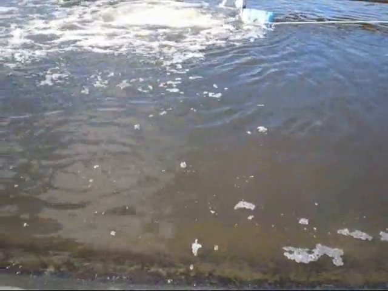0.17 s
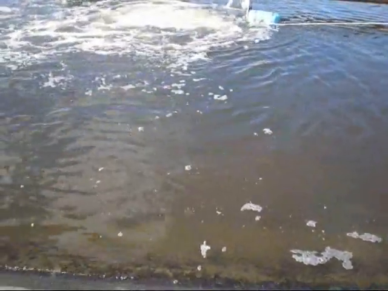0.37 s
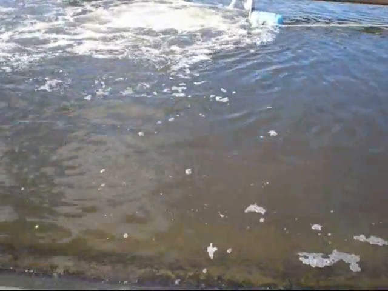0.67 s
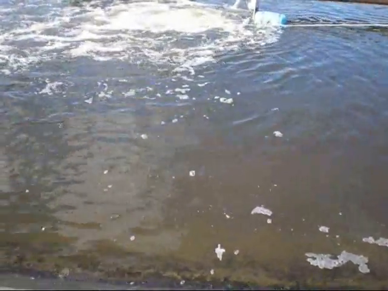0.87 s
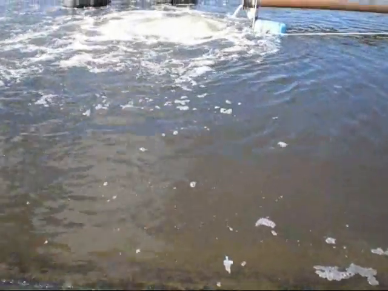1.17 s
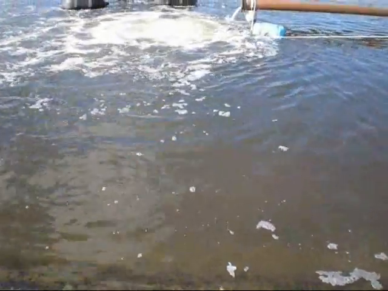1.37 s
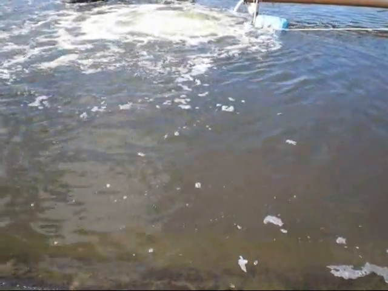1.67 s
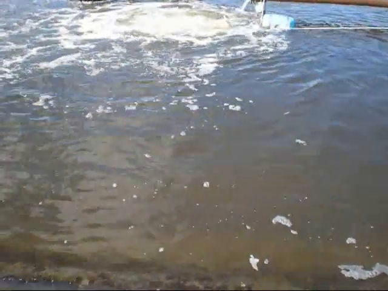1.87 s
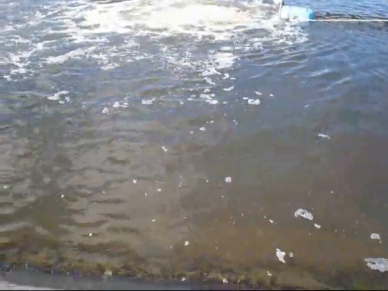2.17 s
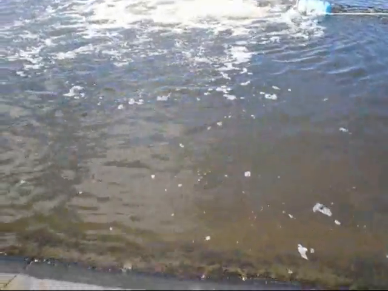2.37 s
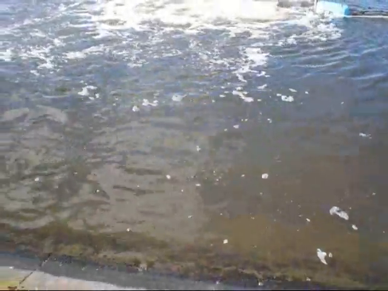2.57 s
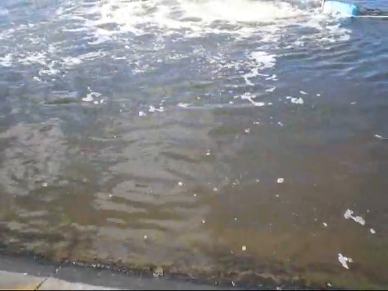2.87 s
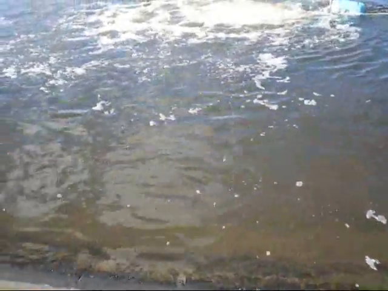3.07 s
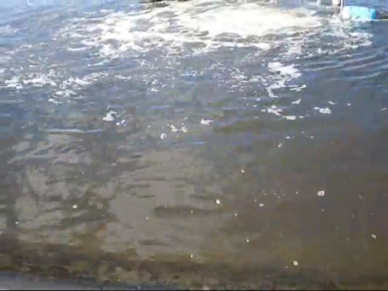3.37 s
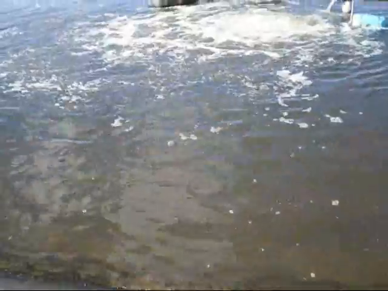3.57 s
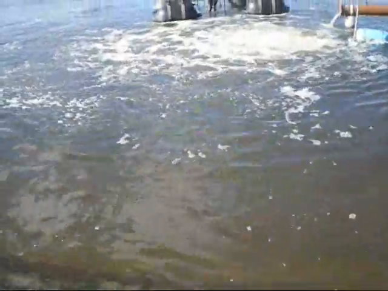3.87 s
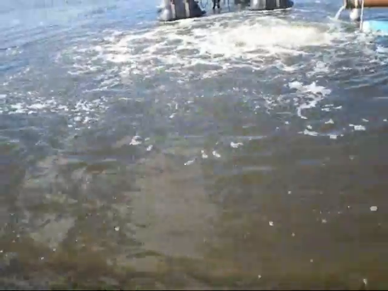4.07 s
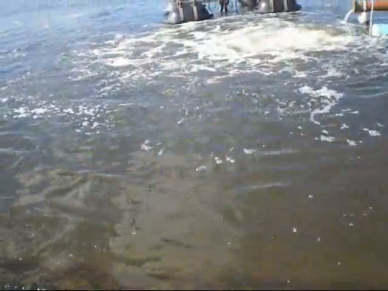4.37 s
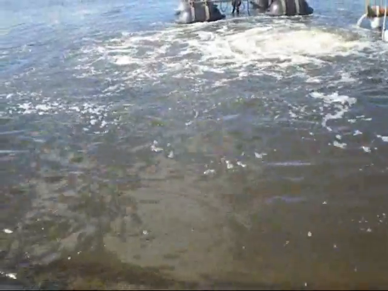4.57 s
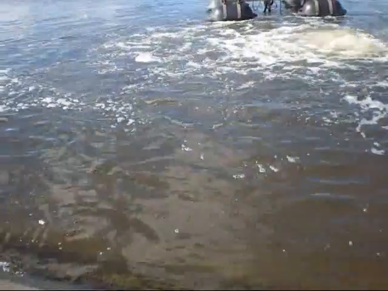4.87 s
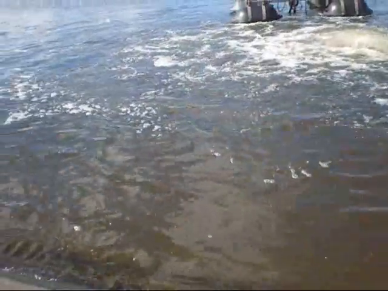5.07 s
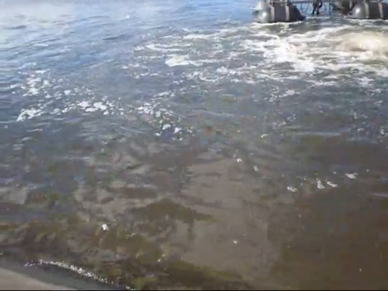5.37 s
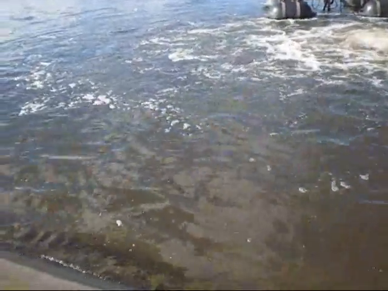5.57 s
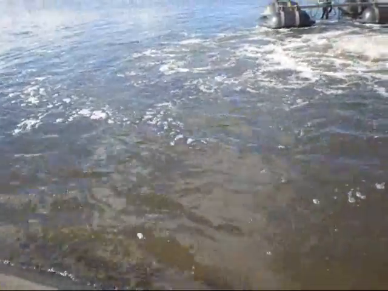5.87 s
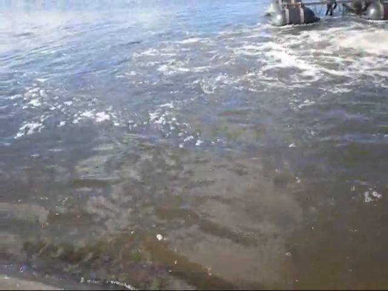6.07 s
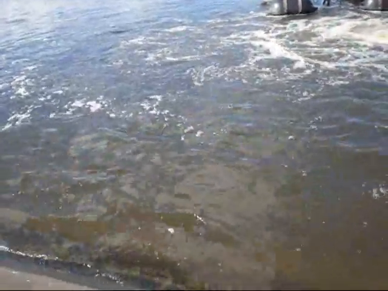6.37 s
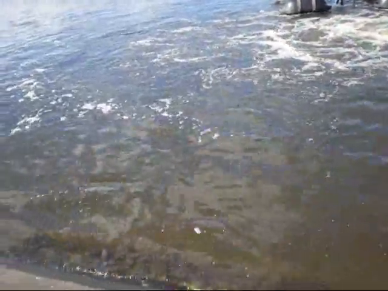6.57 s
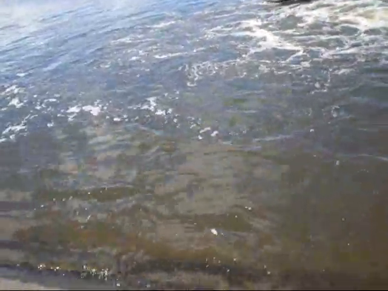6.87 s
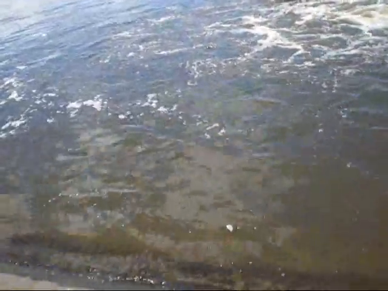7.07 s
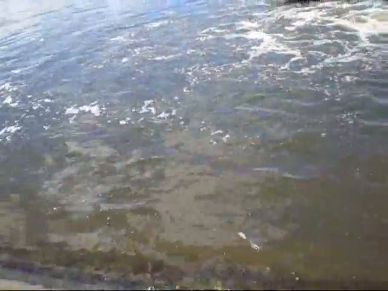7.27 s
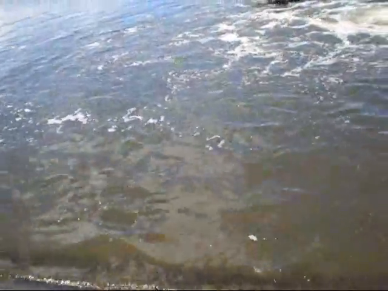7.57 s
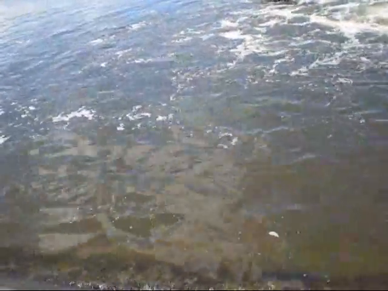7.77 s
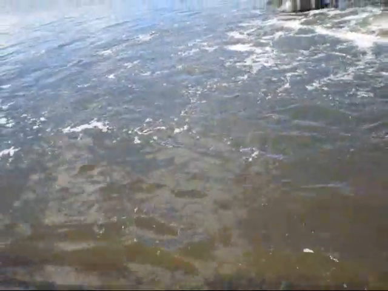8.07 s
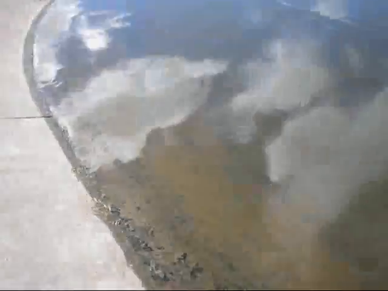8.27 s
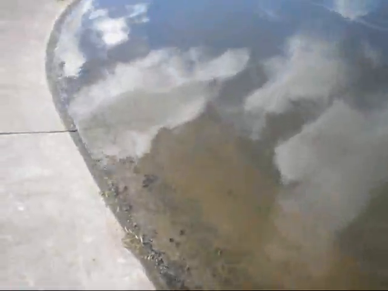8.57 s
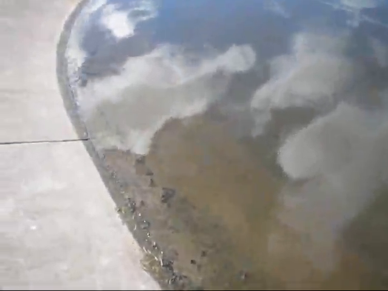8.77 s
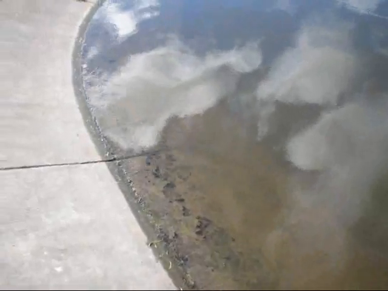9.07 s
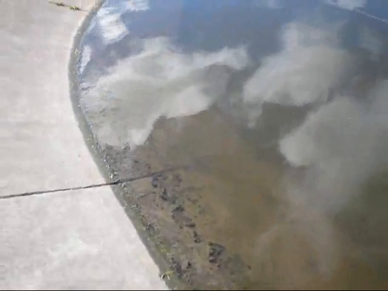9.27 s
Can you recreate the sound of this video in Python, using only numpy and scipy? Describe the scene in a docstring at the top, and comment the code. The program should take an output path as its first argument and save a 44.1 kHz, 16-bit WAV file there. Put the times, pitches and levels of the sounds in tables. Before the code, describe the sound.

Outdoors by a pond, a surface aerator churns out a steady, hollow, fizzing rush of water while strong gusts rumble, flutter and clip on a cheap small-camera microphone, making the splashing duck. The wind weakens and the water comes forward, brighter and clearer. An abrupt cut leaves a faint far wash, a few soft low wind thumps, two small dry knocks close by, and a late puff.

```python
"""By a pond, a surface aerator churns and sprays while gusty wind buffets the microphone of a small camera.
Gusts drive the limiter, which ducks the splashing; the wind eases, the camera turns, the water comes forward.
After a sudden cut at 8.4 s there remain a far wash, a few slow eddies thumping the microphone, faint
wind with a late puff, and two small knocks near the camera.
Throughout, the camera samples coarsely and holds each sample, which mirrors the sound into the treble."""
import sys
import numpy as np
from scipy.fft import rfft, irfft, next_fast_len
from scipy.io import wavfile
from scipy.ndimage import uniform_filter1d, map_coordinates

SR = 44100
rng = np.random.default_rng(int(sys.argv[2]) if len(sys.argv) > 2 else 0)


def generate_wav(sig):
    """Save sig (samples, or channels by samples) to the path in sys.argv[1] as 16-bit PCM at SR."""
    pcm = np.round(np.clip(np.atleast_2d(sig).T, -1, 1) * 32767).astype(np.int16)
    wavfile.write(sys.argv[1], SR, pcm)


N = 414540
TIME = np.arange(N) / SR  # seconds
CUT_S = 8.362  # from the near aerator to the far water
ECHO_S = 1 / 117.2  # echo delay: resonances 117.2 Hz apart


def aerator():
    """Thrown water falls back: low bubbles in the churn, fine drops in the spray, coloured by the camera's aim."""
    # how far the camera has turned from the aerator: time_s, share (0-1)
    turn_path = [(0, 0), (3.5, 0.02), (5.5, 0.6), (7, 0.69), (8.3, 1)]
    # spectrum of the churn: frequency_hz, relative_level_db
    churn_colour = [(200, -8), (600, -7.5), (820, -8), (940, -1.5), (1180, 4.5), (1300, 5), (1470, -2.5),
                    (1660, 9), (1820, 2.5), (2050, 0), (2600, -35), (3900, -44)]
    # spectrum of the spray with the camera facing it: frequency_hz, relative_level_db
    facing_colour = [(800, -48), (1400, 5.5), (1900, -6), (2100, -3), (2360, 7), (2600, 2.5), (2830, 1),
                     (3060, -9), (3550, -6), (3980, -7.5)]
    # spectrum of the spray with the camera turned away: frequency_hz, relative_level_db
    turned_colour = [(800, -16.5), (1400, -26), (1900, -13.5), (2130, -10), (2400, -2), (2650, -1),
                     (2920, 1.5), (3150, -9), (3400, -7.5), (3980, -6)]
    churn_db, spray_db = -26, -21  # levels while facing the aerator
    churn_turn_db, spray_turn_db = 8, 4.5  # gained over the full turn

    turn, = curves(turn_path)
    surge_db = 0.5 * wobble(25) + 0.95 * wobble(70)

    low_bubbles = bubbles(816, 1860, cycles=22.4, spread_db=2.0, count=7000)
    churn = hollow(rng.standard_normal(N) + 0.33 * low_bubbles, ECHO_S)
    churn_level_db = churn_db + churn_turn_db * turn + 0.15 * wobble(40)
    churn = coloured(churn, churn_colour) * amp(churn_level_db)

    fine_bubbles = bubbles(1376, 5940, cycles=11.0, spread_db=4.0, count=9000)
    drops = hollow(rng.standard_normal(N) + 0.2 * fine_bubbles, ECHO_S)
    spray = (1 - turn) * coloured(drops, facing_colour) + turn * coloured(drops, turned_colour)
    spray *= amp(spray_db + spray_turn_db * turn)
    return amp(surge_db) * (churn + spray)


def bubbles(low_hz, high_hz, cycles, spread_db, count):
    """A swarm of short bubble notes, most faint and a few loud, each falling 60 dB in the given cycles."""
    when, pitch, size = rng.random((count, 3)).T
    t = np.arange(SR // 100) / SR
    pitch_hz = low_hz * (high_hz / low_hz) ** pitch
    turns = pitch_hz[:, None] * t
    loud = amp(spread_db * np.minimum(-np.log(1 - size), 5))
    notes = loud[:, None] * np.sin(2 * np.pi * turns) * amp(-60 * turns / cycles)
    at = (when * N).astype(int)[:, None] + np.arange(len(t))
    return unit(np.bincount(at.ravel(), notes.ravel(), N)[:N])


def hollow(x, delay_s):
    """A short repeating echo combs the rush into evenly spaced resonances."""
    # strength of the echo that makes the water hollow: frequency_hz, share fed back (0-1)
    echo_rows = [(500, .05), (800, 0.33), (950, 0.69), (1200, 0.57), (1500, 0.22), (1800, 0.39),
                 (2300, 0.22), (3000, 0.13), (3900, 0.03)]
    hz, share = np.transpose(echo_rows)

    def fed_back(f):
        """Each pass round the echo is weakened and delayed."""
        return np.interp(f, hz, share) * np.exp(-2j * np.pi * f * delay_s)

    return filtered(x, lambda f: 1 / (1 - fed_back(f)))


def wind():
    """Large eddies rumble; small ones strike one by one and flutter above the rumble, more so in fast air."""
    # wind on the microphone before the cut: time_s, strength_db
    wind_path = [(0.0, -1.5), (0.56, -7.6), (1.61, -3), (1.68, -10), (1.89, -7), (2.24, -6), (2.31, -8),
                 (2.45, -9), (2.52, -9), (2.94, -3.5), (3.22, -6.5), (3.36, -2.5), (3.85, -4), (3.92, -6.3),
                 (4.27, -3.5), (4.34, -3.5), (5.04, -8), (5.53, -3.5), (5.6, -10.0), (6.16, -15.5),
                 (6.3, -10), (6.65, -6), (6.72, -15.5), (7.0, -12), (7.21, -12.9), (7.7, -17),
                 (7.84, -15.5), (8.12, -14), (8.26, -22.5), (8.33, -16)]
    # wind on the microphone after the cut: time_s, strength_db (before calm_db)
    calm_path = [(8.37, -10.5), (8.526, -34), (8.876, -31), (8.906, -17), (9.118, -26), (9.132, -42),
                 (9.25, -40), (9.272, -21.5), (9.4, -9.5)]
    # instants when rumble and flutter drop out: centre_s, depth_db
    lulls = [(0.811, 24), (1.347, 17), (1.95, 6), (3.52, 23), (3.817, 20), (4.262, 18), (4.295, 26),
             (4.896, 20), (5.41, 5), (5.762, 12), (7.217, 8)]
    # air speed: time_s, ratio (1 leaves the spectra where they are)
    air_speed = [(0, 1.34), (1.5, 1.267), (2.6, 1.174), (3.4, 1.307), (4.6, 1.2), (4.85, 0.89), (6, .82),
                 (6.4, .95), (8, 0.8), (8.6, .62), (9.4, .7)]
    # spectrum of the rumble at speed 1: frequency_hz, relative_level_db
    rumble_colour = [(12, -25), (30, -38), (55, -4), (90, 0), (140, 1), (220, -3.5), (330, -10),
                     (550, -30.5), (1200, -26.5), (3900, -80)]
    # spectrum of the flutter before eddies shift it: frequency_hz, relative_level_db
    flutter_colour = [(70, -11.5), (150, -10.5), (240, 0.5), (400, -1), (600, -8.5), (850, -13.5),
                      (1300, -33), (2200, -66), (3900, -27.5)]
    rumble_db, flutter_db = -2.5, -10.5  # against the wind's strength
    calm_db = -0.5  # trim after the cut
    flutter_power = 2.5  # flutter amplitude grows as this power of the air speed
    gust_swing_db, gusts_per_s = 1, 30  # random swing of the strength
    puff_db, puff_grows = 9, 0.86  # gain at strength 0 dB; dB gained per dB of wind

    before_db, = curves(wind_path)
    after_db, = curves(calm_path)
    strength_db = np.where(TIME < CUT_S, before_db, after_db + calm_db)
    gust_db = strength_db + gust_swing_db * wobble(gusts_per_s) - bumps(lulls, half_s=0.0087)
    speed, = curves(air_speed)
    eddies = wobble(90)

    # a fast eddy is both louder and higher
    rumble = carried(noise(rumble_colour), speed * np.exp(.22 * eddies))
    rumble *= amp(rumble_db + 1.7 * eddies)

    strikes = spikes(per_second=230, spread_db=8) + 0.27 * rng.standard_normal(N)
    flutter = carried(coloured(strikes, flutter_colour), np.exp(.2 * eddies + .15 * wobble(140)))
    flutter *= speed ** flutter_power * amp(flutter_db + 1.6 * eddies + 1.64 * wobble(30))

    blasts = puffs(evenness=0.29) * amp(puff_db + puff_grows * strength_db)
    return amp(gust_db) * (rumble + flutter) + blasts + thumps(cycles=0.57)


def spikes(per_second, spread_db):
    """Random impulses of either sign and uneven size, at rms 1."""
    when, size, sign = rng.random((int(per_second * N / SR), 3)).T
    strike = np.sign(sign - .5) * amp(spread_db * size)
    return unit(np.bincount((when * N).astype(int), strike, N))


def carried(x, speed):
    """Eddies swept past at a varying speed: faster air gives higher frequencies."""
    return map_coordinates(x, [np.cumsum(speed) % N], order=3, mode="wrap")


def puffs(evenness):
    """Single fast eddies give short, brighter blasts, their noise partly evened in strength."""
    # sharp puffs, before the wind's strength scales them: start_s, relative_level_db
    puff_rows = [(0.045, -22), (0.385, -7), (0.527, -12), (0.564, -9), (0.876, -5.5), (1.229, -1),
                 (1.368, -6.5), (1.415, -10), (1.434, -1.5), (1.482, -3.5), (1.739, -3), (1.762, -1.5),
                 (1.855, -5), (1.889, -1), (2.387, -4.5), (2.415, -6.5), (2.645, -10), (2.769, -4.5),
                 (2.905, -6.5), (3.057, -12), (3.088, -4), (3.342, -10.5), (3.36, -14), (3.683, -8),
                 (3.717, -4), (3.922, -1.5), (4.018, -15), (4.357, -8), (4.407, -4), (4.465, -5),
                 (4.609, -6.5), (5.364, -3), (5.486, -2.5), (5.719, -4), (6.058, -5), (6.324, -1.5),
                 (6.403, -5), (6.456, -4.5), (7.027, -2.5), (7.169, -1), (9.351, -9.5)]
    # spectrum of a puff before evening: frequency_hz, relative_level_db
    puff_colour = [(90, -24), (220, 11.5), (450, 2.5), (750, -4), (1100, -13.5), (1600, -27), (2300, -32),
                   (3900, -55.5)]
    attack_s, hold_s, release_s = 0.00082, 0.0077, 0.0068
    corners_s = np.cumsum([0, attack_s, hold_s, release_s])
    swell = sum(amp(db) * np.interp(TIME, s + corners_s, [0, 1, 1, 0]) for s, db in puff_rows)
    blast = noise(puff_colour)
    strength = np.sqrt(np.abs(uniform_filter1d(blast ** 2, size=200)) + 1e-6)
    return swell * unit(blast / strength ** evenness)


def thumps(cycles):
    """A lone eddy pushes and pulls the diaphragm about once."""
    # single slow eddies in the calm: centre_s, level_db (of the envelope), pitch_hz
    eddy_rows = [(8.373, -5.5, 132), (8.914, -14, 162.1), (8.947, 1, 123), (9.041, -7, 109),
                 (9.103, -12, 100), (9.306, -11, 189.1), (9.354, 0, 241), (9.374, -18, 260),
                 (9.388, 0, 190)]
    phases = ((db, (TIME - s) * hz) for s, db, hz in eddy_rows)
    return sum(amp(db) * np.sin(2 * np.pi * turns) * np.exp(-(turns / cycles) ** 2)
               for db, turns in phases)


def ticks(t60, crack_s):
    """A knock is a dry, dull crack with a brief ring; each falls 60 dB in its given seconds."""
    # small knocks near the camera: start_s, level_db (ring at onset), ring_hz
    knocks = [(9.0747, -14, 900), (9.126, -23, 2300)]
    out = np.zeros(N + SR)
    t = np.arange(SR // 20) / SR
    for s, db, ring_hz in knocks:
        dull = uniform_filter1d(uniform_filter1d(rng.standard_normal(len(t)), size=10), size=6)
        crack = .65 * unit(dull) * amp(-60 * t / crack_s)
        ring = np.sin(2 * np.pi * ring_hz * t) * amp(-60 * t / t60)
        out[round(s * SR):][:len(t)] += amp(db) * (crack + ring)
    return out[:N]


def far_wash():
    """Duller splashing from across the pond, bubbles in a rush of noise, swelling at random."""
    # spectrum of the far water: frequency_hz, relative_level_db
    far_colour = [(60, 5.5), (200, 1), (420, -4.5), (700, -8), (830, -2), (1000, -7.5), (1380, 1),
                  (1750, -5), (1900, -6.5), (2300, -11.5), (3000, -14.5), (3950, -16)]
    wash_db = -31
    water = rng.standard_normal(N) + 0.25 * bubbles(522, 3000, cycles=23, spread_db=1.5, count=4000)
    return coloured(hollow(water, ECHO_S), far_colour) * amp(wash_db + 0.87 * wobble(25))


def amp(db):
    """Decibels to gain."""
    return 10 ** (np.asarray(db) / 20)


def unit(x):
    """Scale to rms 1."""
    return x / np.sqrt(np.mean(x ** 2) + 1e-20)


def curves(rows):
    """One value per sample for each column after the time."""
    s, *cols = np.transpose(rows)
    return [np.interp(TIME, s, c) for c in cols]


def wobble(rate):
    """A smooth random curve, rate knots a second."""
    return map_coordinates(rng.standard_normal(int(N * rate / SR) + 4), [TIME * rate])


def bumps(rows, half_s):
    """Smooth bumps of the given (centre, height), falling to 1/e at half_s from the centre."""
    return sum(height * np.exp(-((TIME - s) / half_s) ** 2) for s, height in rows)


def filtered(x, response):
    """x times a response of frequency."""
    m = next_fast_len(N + SR // 2)  # padding keeps the tail from wrapping to the start
    return irfft(rfft(x, m) * response(np.fft.rfftfreq(m, 1 / SR)), m)[:N]


def coloured(x, points):
    """x shaped by (Hz, dB) points, at rms 1."""
    f, db = np.transpose(points)
    return unit(filtered(x, lambda hz: amp(np.interp(np.log(hz + 1), np.log(f), db))))


def noise(points):
    """Fresh noise of the given colour."""
    return coloured(rng.standard_normal(N), points)


def scene():
    """Near water before the cut, far water after it, wind throughout, knocks close by."""
    # the splashing swells: centre_s, gain_db
    swells = [(2.34, 6), (8.22, 3.5), (8.72, 0), (8.9, 2), (9.2, 3.5)]
    water = np.where(TIME < CUT_S, aerator(), far_wash()) * amp(bumps(swells, half_s=.055))
    return (water + wind() + ticks(t60=0.016, crack_s=0.018))[None]


def limited(x, sense_s, attack_s):
    """A loud moment pulls the gain down fast; it climbs back at a steady rate. Peaks beyond full scale clip."""
    ceiling, recovery_db_per_s = 0.39, 62  # short-term rms where limiting starts; speed of recovery
    firmness = 0.94  # share of the excess dB that is taken off
    level = np.sqrt(np.abs(uniform_filter1d(x ** 2, max(2, int(sense_s * SR)))))
    cut_db = firmness * 20 * np.log10(np.maximum(level / ceiling, 1))
    recovered_db = recovery_db_per_s * TIME
    # the deepest cut so far, less what has been recovered since
    gain = amp(recovered_db - np.maximum.accumulate(cut_db + recovered_db))
    smooth_gain = uniform_filter1d(gain, max(2, int(attack_s * SR)))
    return np.clip(x * smooth_gain, -1, 1)


def record(dry):
    """Limiter, then coarse sample-and-hold, whose steps add a gritty treble, then the band limit."""
    hold_hz, top_hz = 8000, 15750  # coarse sample rate; upper band limit
    x = filtered(limited(dry[0], sense_s=0.0041, attack_s=0.0048), lambda hz: hz < hold_hz / 2)
    held_at = np.floor(TIME * hold_hz) * SR / hold_hz
    steps = map_coordinates(x, [held_at], mode="nearest")
    return filtered(steps, lambda hz: hz < top_hz)[None]


dry = scene()
out = record(dry)
generate_wav(out)
```